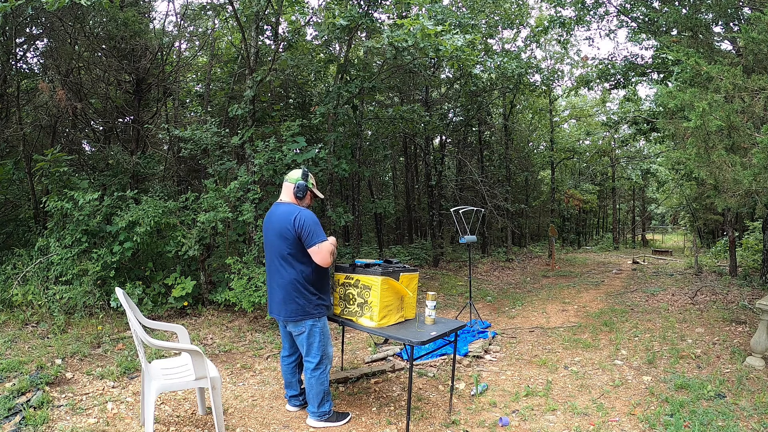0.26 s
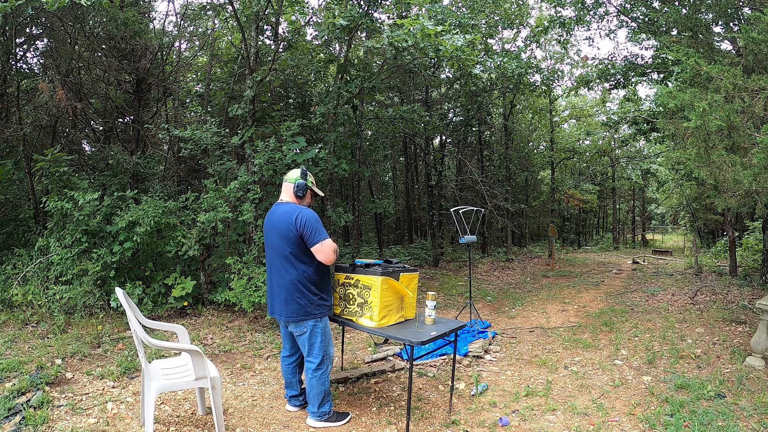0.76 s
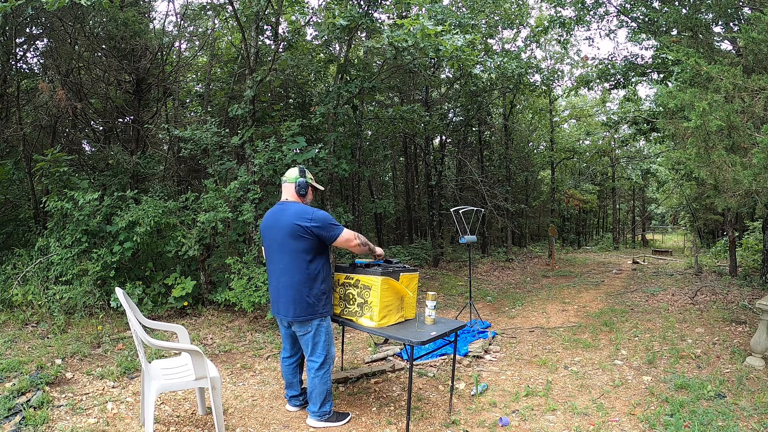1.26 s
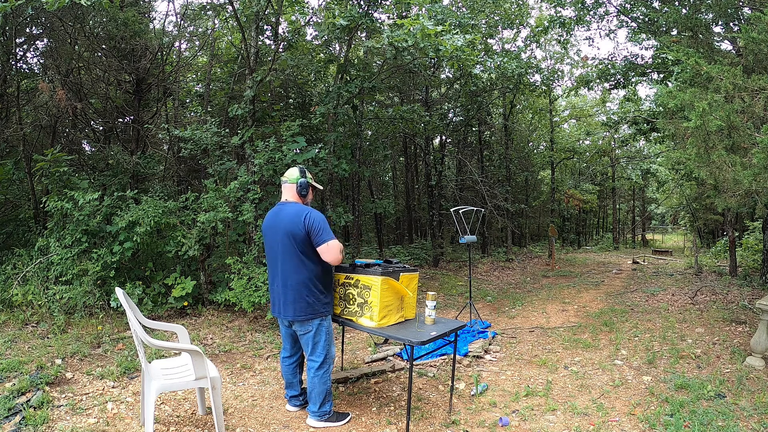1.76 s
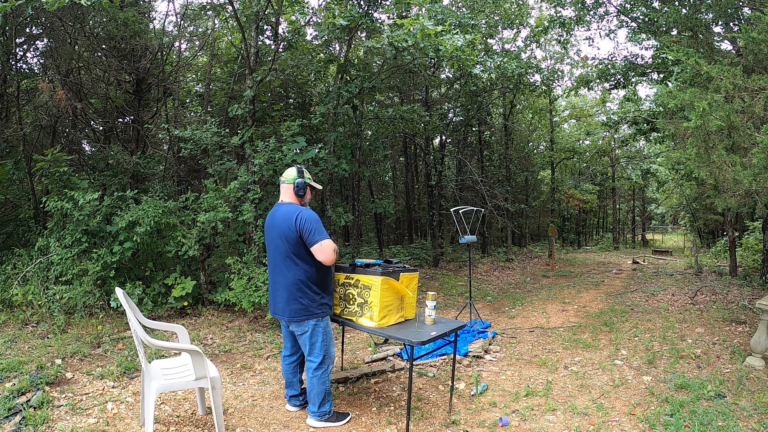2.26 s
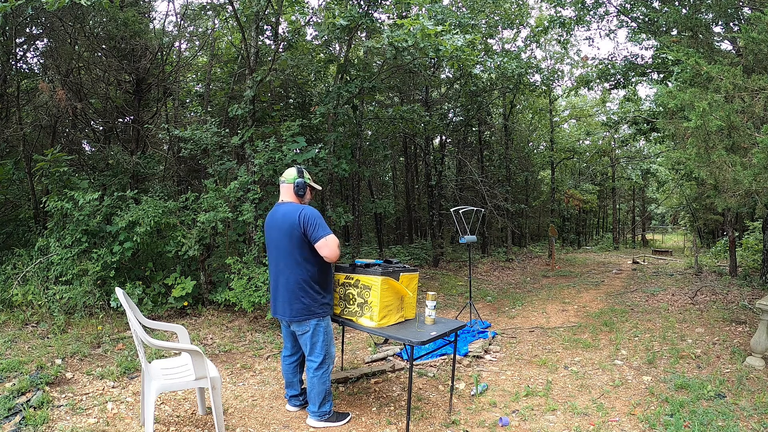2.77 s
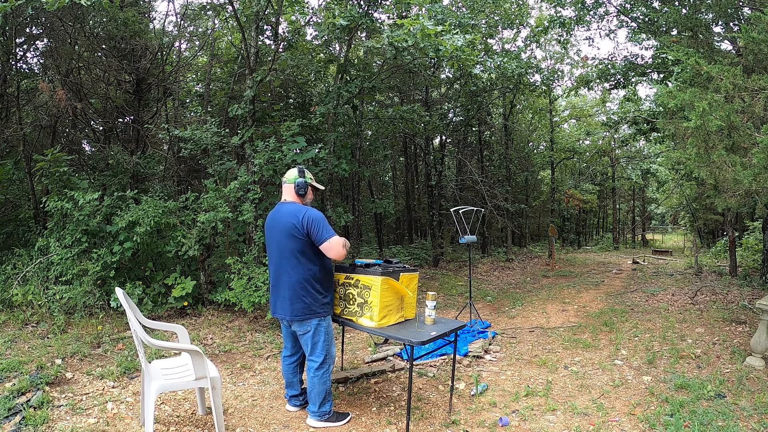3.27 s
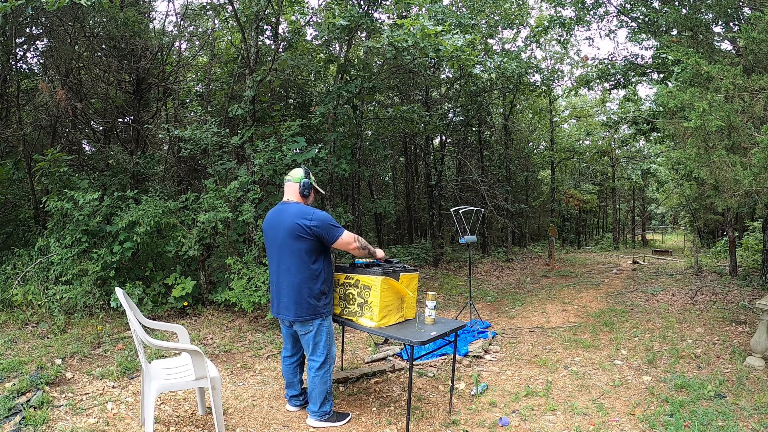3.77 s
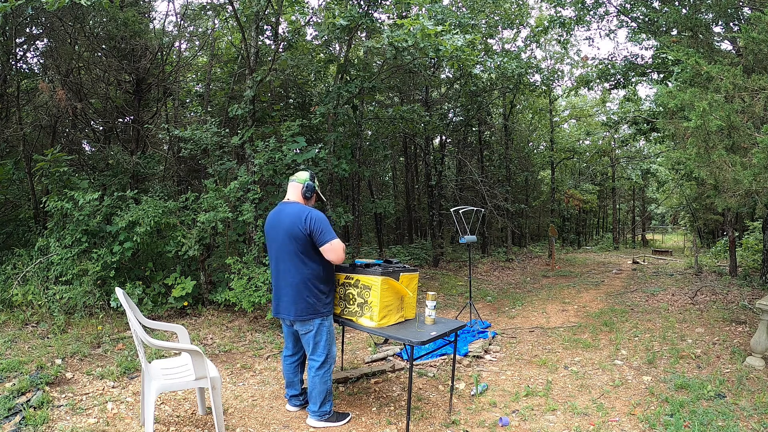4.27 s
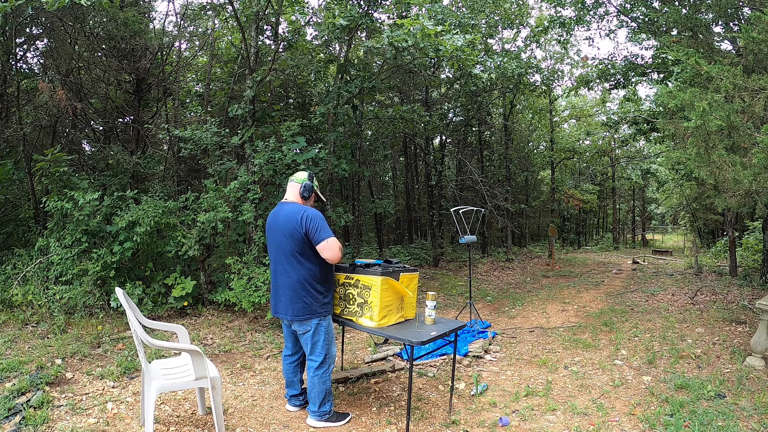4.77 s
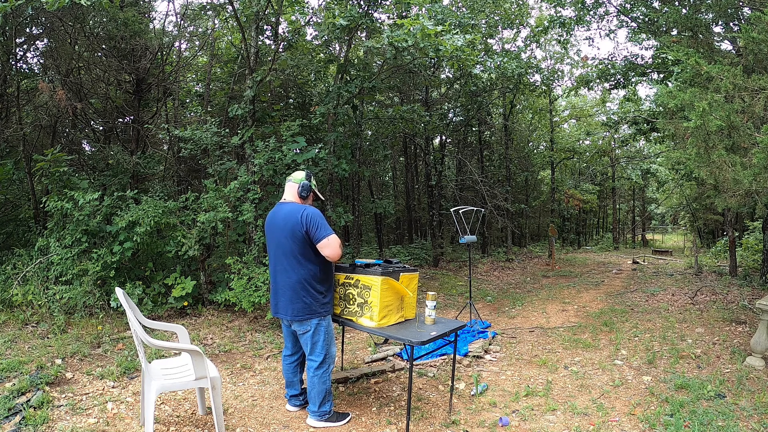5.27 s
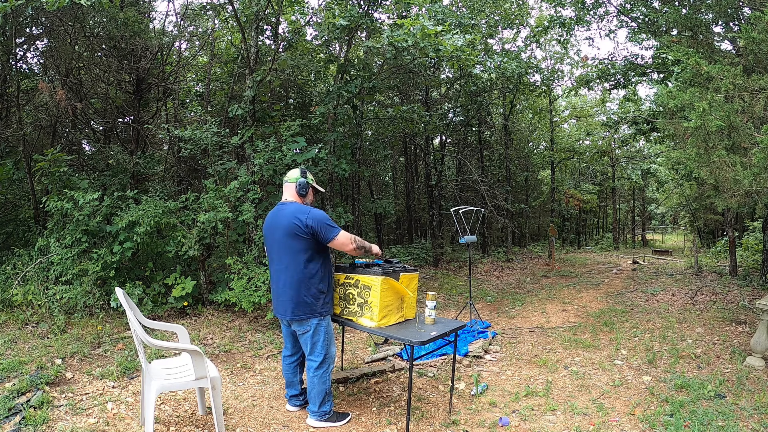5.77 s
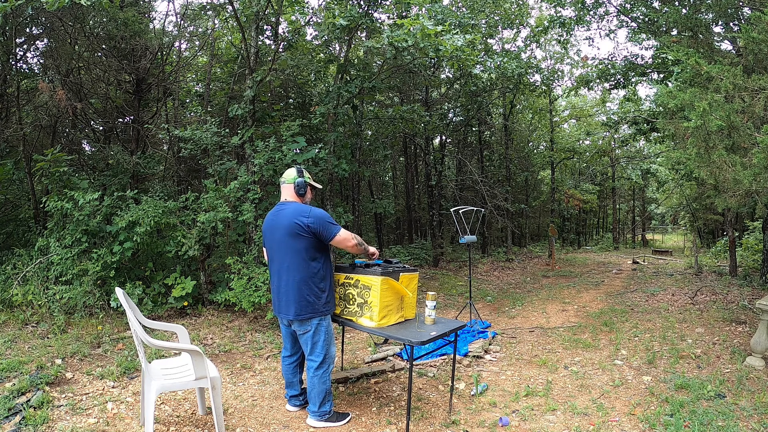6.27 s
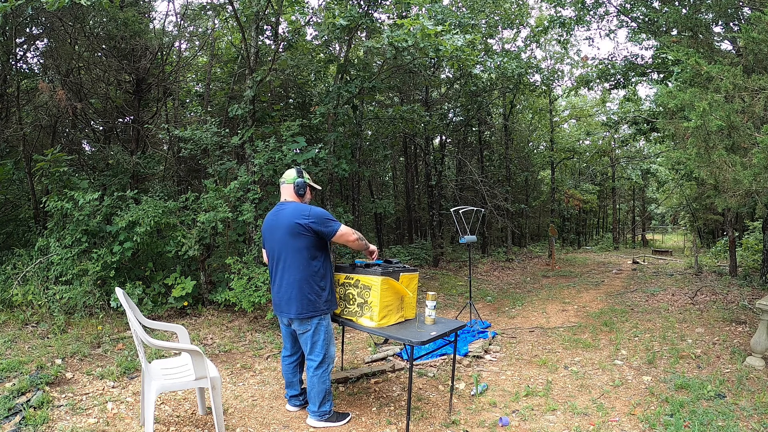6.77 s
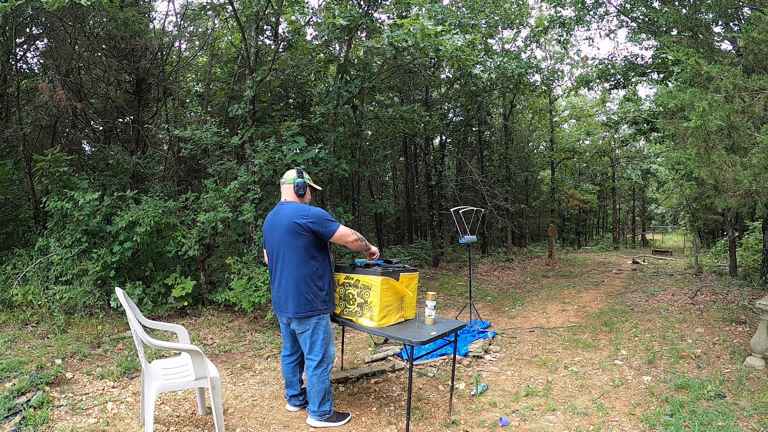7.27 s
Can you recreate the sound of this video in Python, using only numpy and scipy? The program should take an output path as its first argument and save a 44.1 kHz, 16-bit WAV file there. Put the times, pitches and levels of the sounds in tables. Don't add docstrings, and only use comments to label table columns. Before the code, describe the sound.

Dry metallic clicks and hollow plastic knocks from loading rounds stand out against a quiet wood. A double cluster of clacks comes early, a pick and stronger cluster follow, then a dull thump, another sharp press, and finally loose picking and tapping. A dove coos softly at the start, a small bird buzzes occasionally, and traffic and an engine hum far away. Mono microphone a few steps off, short scattered tree echoes.

```python
import sys
import numpy as np
from scipy import signal
from scipy.io import wavfile
from scipy.ndimage import uniform_filter1d

SR = 44100
rng = np.random.default_rng(int(sys.argv[2]) if len(sys.argv) > 2 else 0)


def dump_mix(stems):
    frames = np.atleast_2d(stems).T
    limited = np.clip(frames, -1, 1)
    pcm = np.round(limited * 32767).astype(np.int16)
    wavfile.write(sys.argv[1], SR, pcm)


def volts(x):
    e = np.asarray(x, float) / 20
    return 10 ** e


N = 331191
T = np.arange(N) / SR
FOCUS_DB = 8.5
BLOW_SAMPLES = 1500

# (frequency [Hz], level [dB], t60 [s])
SHELL_MODES = [(1410, -8, 0.041), (1660, -6.5, 0.0034), (1864, 1, 0.0068), (2250, -8, 0.022),
               (2290, 5.5, 0.0044), (3130, -7.5, 0.0046)]
# (frequency [Hz], level [dB], t60 [s])
UPPER_MODES = [(3324, -6.5, 0.025), (4180, 7, 0.0045), (4330, -13, 0.015), (5010, 5, 0.0042),
               (5000, -8, 0.0077)]
# (frequency [Hz], level [dB], t60 [s])
STEEL_MODES = [(6040, 9, 0.0029), (7460, 2.5, 0.007), (7550, 6, 0.008), (8245, -8.5, 0.054),
               (9200, 6.5, 0.0058), (10500, -3.5, 0.0066)]
# (frequency [Hz], level [dB], t60 [s])
TOP_MODES = [(12200, 22, 0.0042), (13370, -15, 0.0069), (13400, 22, 0.0036), (14300, -29, 0.0026)]


def evened(x):
    return x / np.sqrt(np.mean(x ** 2) + 1e-20)


def add(mix, s, sound):
    part = mix[round(s * SR):][:len(sound)]
    part += sound[:len(part)]


def curve(rows, column):
    rows = np.array(rows)
    return np.interp(T, rows[:, 0], rows[:, column])


def hiss(points, patchy_db, size=1024):
    frames, bins = 4 * N // size + 5, np.fft.rfftfreq(size, 1 / SR)
    real, imag, patches = rng.standard_normal((frames, len(bins), 3)).T
    patches = uniform_filter1d(patches, size=12, axis=0)
    patches = evened(uniform_filter1d(patches, size=8, axis=1))
    hz, db = np.transpose(points)
    shape_db = np.interp(np.log(bins + 1), np.log(hz + 1), db)[:, None]
    spectrum = (real + 1j * imag) * volts(shape_db + patchy_db * patches)
    noise = signal.istft(spectrum, nperseg=size, noverlap=3 * size // 4)[1]
    return evened(noise[:N])


def narrowed(noise, width_hz):
    r = np.exp(-np.pi * width_hz / SR)
    return signal.lfilter([1], np.convolve([1, -r], [1, -r]), noise)


def fuzz(length_s, hz, width_hz):
    t = np.arange(round(length_s * SR)) / SR
    noise = [1, 1j] @ rng.standard_normal((2, SR // 4))[:, :len(t)]
    carrier = np.exp(2j * np.pi * hz * t)
    return evened((narrowed(noise, width_hz) * carrier).real)


def gusts():
    # (time of peak [s], heave level [dB], length [s])
    gust_rows = [(0.045, -20.5, 0.19), (0.165, -14, 0.07), (0.412, -12, 0.22), (0.782, -11, 0.24),
                 (1.114, -13.5, 0.24), (1.44, -11.5, 0.28), (1.59, -14, 0.14), (1.864, -17.5, 0.13),
                 (2.066, -21, 0.093), (2.329, -16, 0.18), (2.52, -16, 0.11), (2.827, -18.5, 0.37),
                 (3.062, -14.5, 0.14), (3.3, -18.5, 0.16), (3.484, -15, 0.24), (3.789, -13.5, 0.18),
                 (3.96, -10.5, 0.18), (4.12, -13, 0.24), (4.514, -18, 0.1), (4.77, -26.5, 0.23),
                 (5.21, -23, 0.23), (5.526, -24, 0.36), (5.79, -19, 0.19), (6.23, -25, 0.14),
                 (6.675, -24, .35), (6.993, -31.5, 0.16), (7.278, -19.5, 0.29), (7.414, -11, 0.084)]
    calm_db = -35.5
    t = T[::50]
    power = volts(2 * calm_db)
    for s, db, length_s in gust_rows:
        power = power + volts(2 * db) * np.exp(-(3 * (t - s) / length_s) ** 2)
    return np.interp(T, t, np.sqrt(power))


def heave():
    swings = sum(np.sin(2 * np.pi * (hz * T + rng.random())) / (1 + (hz / 5.94) ** 4)
                 for hz in np.linspace(2, 14, num=30))
    envelope = abs(signal.hilbert(swings))
    steady = swings / (uniform_filter1d(envelope, size=SR // 8) + 0.7)
    return evened(steady - steady.mean()) * gusts()


def traffic():
    # (frequency [Hz], level per Hz [dB])
    spectrum = [(15, -24), (32, -15.5), (62, -3), (80, -6), (140, -9), (160, -11.5), (250, -22),
                (400, -38.5)]
    return volts(-51.5) * hiss(spectrum, patchy_db=-1.4, size=4096)


def engine():
    # (time [s], frequency [Hz], level [dB])
    track = [(0, 108, -45.5), (.5, 105, -59.5), (1.1, 122, -62), (1.8, 118, -52.5), (2.5, 108, -54),
             (3.0, 110, -59), (3.8, 124, -54.5), (4.6, 118, -58.5), (5.2, 100, -61.5), (5.7, 130, -58.5),
             (6.2, 136, -55), (6.6, 120, -65), (7.1, 130, -50), (7.51, 128, -57.5)]
    phase = 2 * np.pi * np.cumsum(curve(track, 1)) / SR
    waver = narrowed(rng.standard_normal((2, N)), width_hz=14)
    tone = waver[0] * np.cos(phase) + waver[1] * (np.sin(phase) + 0.22 * np.sin(2 * phase))
    return volts(curve(track, 2)) * evened(tone)


def leaves():
    # (frequency [Hz], level per Hz [dB])
    spectrum = [(120, -25), (200, -3), (1180, -10.5), (7010, -17), (14600, -24), (16000, -23)]
    stir = 0.027
    breeze_db = uniform_filter1d(20 * np.log10(gusts()), size=SR)
    level_db = -50.5 + stir * (breeze_db - breeze_db.mean())
    return volts(level_db) * hiss(spectrum, patchy_db=1.16)


def dove():
    # (time [s], length [s], level [dB], first frequency [Hz], last frequency [Hz])
    coos = [
        (.05, 0.19, -57, 490, 589),
        (.22, 0.074, -56, 625, 628),
        (.4, .18, -64, 526, 500),
        (.8, 0.514, -58, 512, 478),
        (2.1, 0.39, -59, 501, 490),
    ]
    swell_share, ends_db = 0.27, -6
    out = np.zeros(N)
    for s, length_s, db, first_hz, last_hz in coos:
        u = np.linspace(0, 1, round(length_s * SR))
        hz = first_hz + (last_hz - first_hz) * u ** 2
        tone = np.sin(2 * np.pi * np.cumsum(hz) / SR)
        swell_db = np.interp(u, [0, swell_share, 1], [ends_db, 0, ends_db])
        add(out, s, np.sqrt(2) * volts(db + swell_db) * tone * signal.windows.tukey(len(u), .1))
    return out


def ring(modes, damping_db_s):
    t = np.arange(BLOW_SAMPLES) / SR
    draws = rng.standard_normal((len(modes), 2)) * [1.5, .015]
    sound = np.zeros(len(t))
    for k, ((hz, db, t60_s), (shift_db, detune)) in enumerate(zip(modes, draws)):
        decay = volts(db + shift_db - 60 * t / t60_s)
        attack = 1 - np.exp(-.4 * hz * t)
        sound += (-1) ** k * decay * attack * np.sin(2 * np.pi * hz * (1 + detune) * t)
    return volts(-damping_db_s * t) * sound / np.sqrt(np.mean(sound[:130] ** 2))


def struck(modes, hz, spot_db, spot_t60_s):
    near = [(f, db - FOCUS_DB * abs(np.log2(f / hz)), t60_s) for f, db, t60_s in modes]
    return near + [(hz, spot_db, spot_t60_s)]


def chatter(sound, skip, bounce):
    t = np.arange(400) / SR
    skips = skip * rng.standard_normal(400) * (rng.random(400) < .1) * np.exp(-t / .003)
    skips[0] = 1
    skips = skips + bounce * np.roll(skips, shift=140)
    return np.convolve(sound, skips / np.linalg.norm(skips))


def wood_echo(send):
    # (frequency [Hz], level [dB])
    spectrum = [(300, -30), (700, -4), (2000, -7), (4000, -5), (8500, -3), (11500, -5), (15500, -13)]
    t = T[:SR // 2]
    build_up = 1 - np.exp(-t / .006)
    echo = hiss(spectrum, patchy_db=2.0, size=256)[:len(t)] * volts(-60 * t / .3) * build_up
    return signal.oaconvolve(send, echo / np.linalg.norm(echo))[:N]


def echoed(blows, echo_db, skip_bounce):
    out, send = np.zeros(N), np.zeros(N)
    onset = 3 * np.exp(-np.arange(BLOW_SAMPLES) / 25)
    for s, db, sound in blows:
        skip, bounce = skip_bounce(db)
        add(out, s, volts(db) * chatter(sound, skip, bounce))
        add(send, s, volts(db + echo_db) * sound * onset)
    return out + wood_echo(send)


def shell_blows(rows, hollow_modes, spot_t60_s):
    for s, db, hz, body_db, upper_db in rows:
        shell = ring(struck(SHELL_MODES, hz, -3, spot_t60_s), 1400)
        body = volts(body_db) * ring(hollow_modes, 0)
        yield s, db, shell + body + volts(upper_db) * ring(UPPER_MODES, 1200)


def steel_blows(rows, damping_db_s):
    for s, db, hz, top_db in rows:
        steel = ring(struck(STEEL_MODES, hz, 3.0, .012), damping_db_s)
        yield s, db, steel + volts(top_db) * ring(TOP_MODES, damping_db_s)


def picks():
    # (time [s], level [dB], strongest ring [Hz], hollow body re blow [dB], upper shell re blow [dB])
    rows = [(.118, -38.5, 2250, -5, -20), (.3956, -43, 2230, 6.5, -2), (.4983, -48, 2030, -17, -1),
            (2.009, -31, 2300, -12, -12), (2.012, -39, 1430, -6.5, -20), (2.1, -50, 2250, -20, -20),
            (2.2764, -47, 2300, -14, -11), (4.4351, -45, 2550, -4.5, -3), (4.7258, -48, 2580, -4.5, -19),
            (5.9242, -41.5, 2570, -17, -22), (5.9464, -41, 2800, -13, -20), (6.0560, -33, 2320, -38, -5.5),
            (6.0569, -26, 2750, -16.5, -10), (6.5034, -40, 2150, -19, -3), (6.505, -31, 2690, -21, -14),
            (6.813, -43, 2620, -26, -17), (6.838, -37.5, 2330, -23, -20), (6.8607, -34.5, 2900, -14, -8.5),
            (7.1245, -43.5, 2100, -9, -17)]
    # (frequency [Hz], level [dB], t60 [s])
    tray_modes = [(900, 2.5, 0.013), (1160, -11, 0.0084), (700, -6, 0.015)]
    return echoed(shell_blows(rows, tray_modes, .011), -15, lambda db: (.12, .25))


def ticks():
    # (time [s], level [dB], strongest ring [Hz], top octave [dB])
    rows = [(.3955, -51, 5900, -3), (.4993, -48, 8600, -17), (0.6819, -30.5, 6700, -4.5),
            (0.7266, -41, 6550, -17), (0.813, -41, 7400, -12), (0.818, -39, 5800, -9),
            (1.3533, -53, 6910, 2), (2.0103, -42.5, 6900, -23), (2.8595, -44, 6370, -13),
            (2.8796, -44.5, 9200, -19), (2.9647, -48, 6400, -11), (2.9831, -35, 6400, -7),
            (2.9974, -47, 9300, -21), (3.0054, -43, 8100, -24), (3.0096, -32.5, 8200, -30),
            (4.4343, -49, 6160, -14), (5.2737, -29.5, 8400, -4), (5.2747, -28, 5160, -20),
            (2.8784, -41.5, 4400, -25), (0.684, -34.5, 4280, -20), (.829, -38, 4200, -25),
            (5.358, -42, 8570, -21.5), (5.451, -45, 8340, -18), (5.4674, -47, 7260, -18),
            (2.887, -37, 4900, -25), (.829, -44, 6230, -20), (5.357, -38, 4500, -25)]
    loose = .9
    return echoed(steel_blows(rows, 2500), -9 + 10 * np.log10(loose),
                  lambda db: (loose * (.15 + volts(2 * db + 54)), loose * .3))


def presses():
    # (time [s], level [dB], strongest ring [Hz], hollow body re blow [dB], upper shell re blow [dB])
    rows = [(.6795, -43, 2280, -1, -6), (.6821, -27, 2000, -2, -7), (.6855, -33.5, 2480, 2, -13),
            (0.7268, -31, 2380, -13, -8), (.7295, -30, 1970, -18, -9), (.8104, -45, 1770, -7, -19),
            (.814, -33, 1980, -27, -18), (.8175, -34.5, 2330, 0, -14), (0.8275, -30, 2400, -35, -10),
            (2.8603, -28, 2560, -12.5, -16), (2.8791, -27, 2540, -8.5, -4), (2.9746, -44.5, 2820, -1, 0),
            (2.9838, -31.5, 1390, -2.5, -5), (2.991, -32, 1430, -5, -8), (3.0054, -24, 2540, -12, -15),
            (3.0088, -25.5, 1470, -16, -13), (3.0141, -35, 2330, -5, 5), (5.2735, -27, 1780, -19.5, 0),
            (5.2788, -26, 2340, -25, -25), (5.2983, -46, 2450, 2, -20), (5.3590, -28, 2480, -17, -5.5),
            (5.4522, -37.5, 2300, -14, -3), (5.4693, -44.5, 2280, -7, -4)]
    # (frequency [Hz], level [dB], t60 [s])
    body_modes = [(758, 1, 0.039), (1030, -1.5, 0.01), (627, 10, 0.0038)]
    return echoed(shell_blows(rows, body_modes, .018), -10.5, lambda db: (.17, .4))


def brushes():
    # (time [s], length [s], level [dB], centre frequency [Hz], width [Hz])
    rows = [(.74, 0.027, -56, 4010, 3000), (0.807, .04, -39, 3965, 6000), (1.352, .1, -53.5, 347, 120),
            (1.40, 0.025, -58, 9500, 2000), (1.466, 0.027, -52, 13500, 2500),
            (1.481, 0.073, -53.5, 319, 120), (2.023, 0.093, -55, 2440, 200), (2.796, 0.082, -58, 3360, 300),
            (2.857, 0.067, -50.5, 700, 120), (2.887, 0.12, -50.5, 4250, 450),
            (3.01, 0.067, -49.5, 711, 120), (3.015, 0.11, -44, 2776, 4040),
            (3.027, 0.11, -49.5, 7500, 2500), (0.682, 0.032, -59, 5000, 5000),
            (5.28, 0.067, -43.5, 8900, 900), (5.283, 0.054, -45, 2490, 3500),
            (5.289, 0.023, -42.5, 3650, 250), (5.369, 0.038, -47, 4520, 4000),
            (5.456, 0.048, -53, 3580, 200), (6.69, 0.033, -55.5, 9500, 2000),
            (6.86, 0.034, -61, 10500, 2000), (6.972, .08, -48, 2004, 200), (7.05, 0.082, -59, 2100, 300)]
    grain_db, grain_s = 0.5, 0.00224
    out = np.zeros(N)
    for s, length_s, db, hz, width_hz in rows:
        sound = fuzz(length_s, hz, width_hz)
        u = np.linspace(0, 1, len(sound))
        grains = uniform_filter1d(rng.standard_normal(SR // 4), size=round(grain_s * SR))
        grains = evened(grains)[:len(u)]
        add(out, s, volts(db + grain_db * grains + 1.5) * sound * 2 * np.sqrt(u) * (1 - u))
    return out


def small_bird():
    # (time [s], level [dB])
    buzzes = [
        (1.738, -59),
        (4.111, -60),
        (5.459, -59),
        (6.713, -57.5),
    ]
    out = np.zeros(N)
    t = np.arange(round(.2 * SR)) / SR
    held = np.minimum(t / 0.0026, 1) * volts(-90 * np.maximum(t - .055, 0))
    for s, db in buzzes:
        add(out, s, volts(db) * held * (fuzz(.2, 7250, 450) + fuzz(.2, 6650, 600) * volts(-100 * t)))
    return out


def thumps():
    # (time [s], level [dB], frequency [Hz], t60 [s])
    rows = [
        (3.035, -36.5, 345, 0.056),
        (3.736, -26.5, 372, 0.056),
        (3.876, -38, 375, 0.051),
        (5.921, -38, 363, 0.1),
    ]
    out, t = np.zeros(N), np.arange(SR // 5) / SR
    for s, db, hz, t60_s in rows:
        attack = 1 - np.exp(-t / 0.021)
        add(out, s, volts(db + 6.5 - 60 * t / t60_s) * attack * np.sin(2 * np.pi * hz * t))
    return out


def taps():
    # (time [s], level [dB], strongest ring [Hz], top octave [dB])
    rows = [(5.9828, -45, 9000, -2), (6.0560, -40, 8050, -20), (6.2960, -41.5, 9600, -6),
            (6.2968, -37.5, 4200, -12), (6.8393, -38, 9570, -11), (6.8607, -31.5, 9500, -3)]
    loose = .15
    return echoed(steel_blows(rows, 9000), -9 + 10 * np.log10(loose),
                  lambda db: (loose * (.15 + volts(2 * db + 54)), loose * .3))


def scene():
    air = heave() + traffic() + engine() + leaves()
    animals = dove() + small_bird()
    loading = picks() + ticks() + presses() + brushes() + thumps() + taps()
    return (air + animals + loading)[None]


def top_cut(x):
    return signal.sosfilt(signal.butter(12, 16780, fs=SR, output="sos"), x)


def record(dry):
    edge_hz, offset = 15950, 0.00016
    low_pass = signal.firwin(1501, edge_hz, window=("kaiser", 3), fs=SR)
    limited = signal.oaconvolve(dry, low_pass[None], "same")
    return top_cut(limited + offset)


dry = scene()
out = record(dry)
dump_mix(out)
```